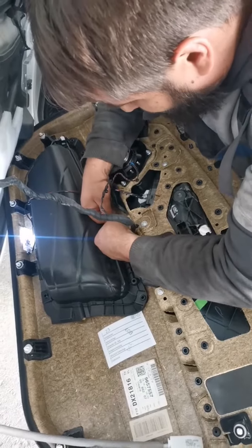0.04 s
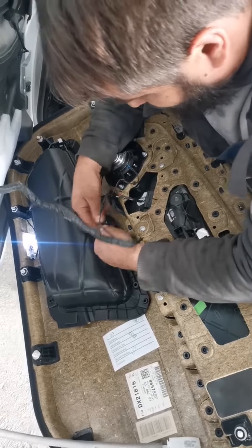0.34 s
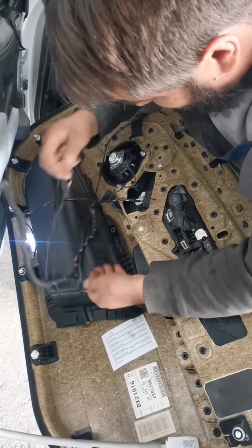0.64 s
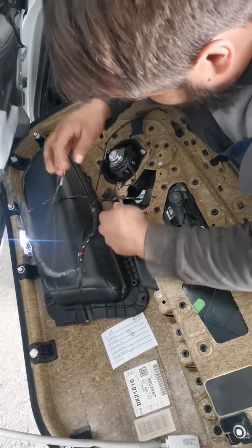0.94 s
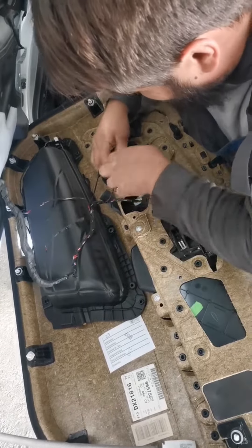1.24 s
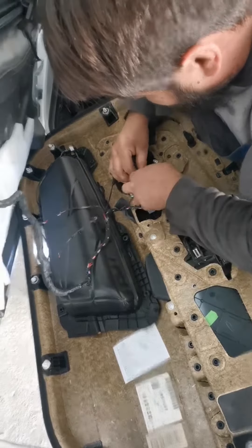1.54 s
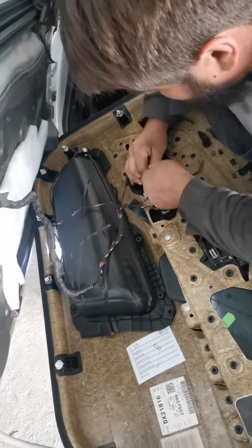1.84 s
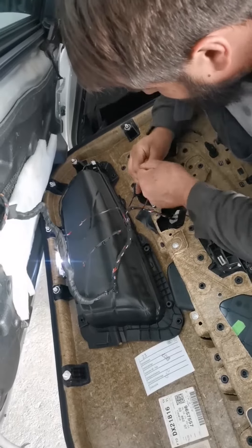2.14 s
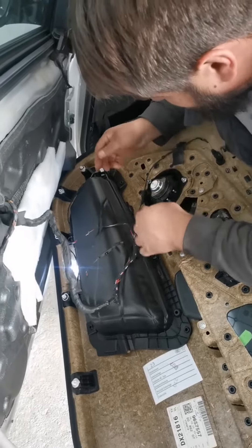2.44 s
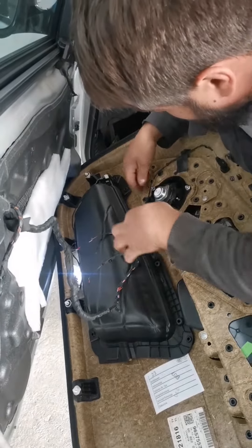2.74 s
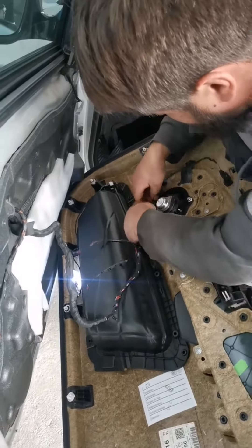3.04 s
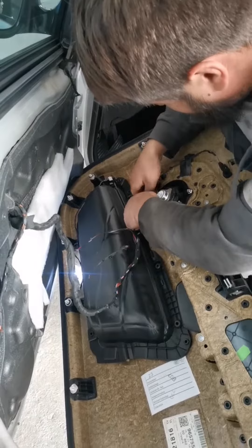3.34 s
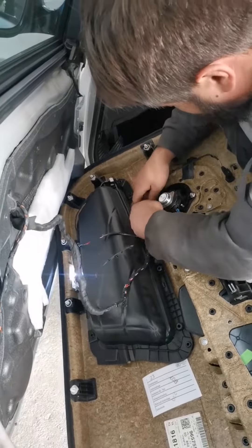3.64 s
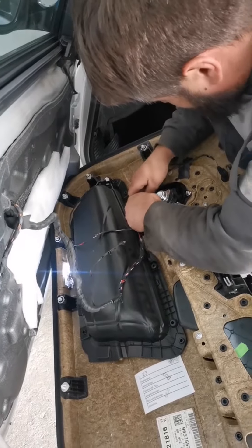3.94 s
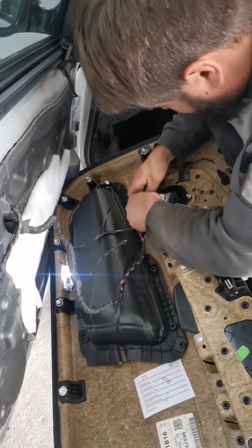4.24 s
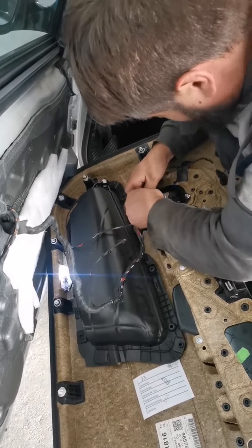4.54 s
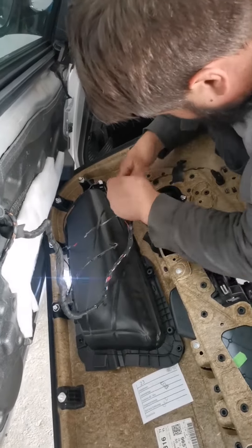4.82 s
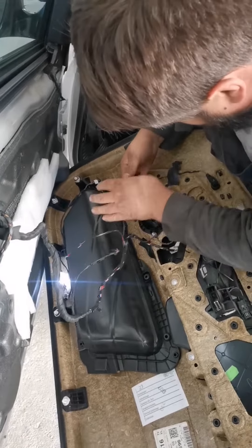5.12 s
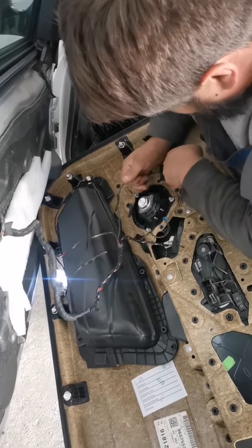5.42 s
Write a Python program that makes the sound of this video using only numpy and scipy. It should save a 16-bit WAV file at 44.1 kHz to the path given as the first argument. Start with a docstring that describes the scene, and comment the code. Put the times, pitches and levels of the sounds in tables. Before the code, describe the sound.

Hands press clips and a connector onto a door panel: sharp plastic cracks, hollow thuds and light scuffing in an echoing workshop.

```python
"""Clipping a car door panel together

Two hands press clips and a wiring connector home on a door trim panel lying in a workshop.
Each snap is a hard plastic crack on top of a hollow knock of the board; small fittings tick between them.
Sleeves and cables rub over the panel, a machine hums far off, and the hall rings on after loud blows."""
import sys
import numpy as np
from scipy import signal
from scipy.fft import rfft, irfft, next_fast_len
from scipy.io import wavfile
from scipy.ndimage import uniform_filter1d

SR = 44100
rng = np.random.default_rng(int(sys.argv[2]) if len(sys.argv) > 2 else 0)


def put_to_file(sound):
    """Save the sound as 16-bit audio at rate SR, in the file named by the first command-line argument."""
    columns = np.atleast_2d(sound).T  # one column per channel
    safe = np.clip(columns, -1, 1)
    whole_steps = np.round(safe * 32767)
    wavfile.write(sys.argv[1], SR, whole_steps.astype(np.int16))


N = 250488


def from_db(db):
    """Turn decibels into a gain."""
    return 10 ** (np.asarray(db) / 20)


def rms_one(x):
    """Scale to an average level (rms) of 1."""
    return x / np.sqrt(np.mean(x ** 2) + 1e-20)


def energy_one(x):
    """Scale every row to an energy of 1."""
    return x / np.sqrt(np.sum(x ** 2, axis=-1, keepdims=True) + 1e-20)


def in_time(rows):
    """Join a table's timed points into one curve per column."""
    times, *columns = np.transpose(rows)
    return [np.interp(np.arange(N) / SR, times, column) for column in columns]


def at_hz(points, hz):
    """Read a table on a log-frequency axis."""
    freqs, values = np.transpose(points)
    return np.interp(np.log(hz), np.log(freqs), values)


def band(x, low, high, order=2):
    """Keep the sound between two frequencies."""
    edges = [max(low, 10), min(high, .45 * SR)]
    return signal.sosfilt(signal.butter(order, edges, "band", fs=SR, output="sos"), x)


def lowpass(x, hz, order):
    """Soften the sound above a frequency."""
    return signal.sosfilt(signal.butter(order, hz, fs=SR, output="sos"), x)


def resonance(x, hz, t60):
    """Ring at one pitch; t60 is the time it takes to fade by 60 dB."""
    r = np.exp(-np.log(1000) / (t60 * SR))
    feedback = [1, -2 * r * np.cos(2 * np.pi * hz / SR), r * r]
    return signal.lfilter(np.array([1, 0, -1]) * (1 - r * r) / 2, feedback, x)


def stereo(mid, side, alike):
    """Mix two unrelated signals into a left and right of the given likeness (0-1)."""
    shared, apart = np.sqrt(1 + alike) * mid, np.sqrt(1 - alike) * side
    return np.stack([shared + apart, shared - apart], axis=-2)


def pan(db):
    """Two gains that make the left louder than the right by db."""
    return rms_one(from_db(db / 2 * np.array([[1], [-1]])))


def drift(rate):
    """Wander at random, heading for a new value `rate` times a second."""
    knots = rng.standard_normal(4096)
    return rms_one(np.interp(np.arange(N) / SR * rate, np.arange(len(knots)), knots))


def add(out, s, sound):
    """Mix a sound in at s seconds."""
    at = round(s * SR)
    out[:, at:at + sound.shape[-1]] += sound[:, :N - at]


def steady(x, size=900):
    """Even out the swells of a noise, as the steady pressure of a hand does."""
    power = np.mean(np.atleast_2d(x) ** 2, axis=0)
    smoothed = uniform_filter1d(uniform_filter1d(power, size), size)
    return rms_one(x / np.sqrt(np.abs(smoothed) + 1e-12))


# how alike left and right are for sound from all around: f/Hz, likeness/0-1
STEREO_LIKENESS = [(60, 0.85), (250, 0.98), (500, 0.75), (1000, 0.03), (2000, 0.02), (14000, 0)]

def diffuse_bands(low_hz=0, high_hz=20000):
    """Noise from all around in half-octave bands, as (centre Hz, band)."""
    white = rng.standard_normal((2, 2, N))
    edges = 32 * 2 ** np.arange(0, 9.1, .5)
    for k, (low, high) in enumerate(zip(edges, edges[1:])):
        hz = np.sqrt(low * high)
        if low_hz <= hz <= high_hz:
            yield hz, stereo(*band(white[k % 2], low, high), at_hz(STEREO_LIKENESS, hz)) / np.sqrt(2)


# tone of the workshop air: f/Hz, relative level/dB
AIR_TONE = [(35, -7), (70, -4), (95, -5.5), (135, -9), (220, -11), (400, -14.5), (1500, -35), (5000, -51),
            (11000, -42.5), (16000, -42)]

def air_noise(level_db=-60):
    """The workshop air makes a steady, low rush from all around."""
    size = next_fast_len(N)
    hz = np.maximum(np.arange(size // 2 + 1) * SR / size, 1)
    white = stereo(*rfft(rng.standard_normal((2, size))), at_hz(STEREO_LIKENESS, hz))
    rush = irfft(white * from_db(at_hz(AIR_TONE, hz)), size)[:, :N]
    return from_db(level_db) * rms_one(band(rush, 30, 17000))


# the motor's notes: f/Hz, base level/dB
MOTOR_NOTES = [(64.8, -60.5), (71.3, -61)]
# how strongly the hum comes through: t/s, gain/dB
HUM_GAIN = [(0, -18), (1, -12), (2, -11.5), (2.5, 0.5), (3.6, 3.5), (5, 1), (5.68, -3)]

def machine_hum(waver_db=2.0, wander_rad=0.92):
    """Two low notes of a distant motor beat against each other."""
    t, notes = np.arange(N) / SR, 0
    for hz, db in MOTOR_NOTES:
        peak = np.sqrt(2) * from_db(db + waver_db * drift(10))
        phase = 2 * np.pi * hz * t + wander_rad * hz / MOTOR_NOTES[0][0] * drift(3.1)
        notes += peak * np.sin(phase)
    return notes * from_db(in_time(HUM_GAIN)[0])


def rub(tone, grip_db, flicker_db, grip_rate):
    """Rubbing noise: all bands swell together as cloth grips and slips, and each flickers a little."""
    grip = grip_db * drift(grip_rate)
    return rms_one(sum(noise * from_db(at_hz(tone, hz) + grip + flicker_db * drift(40))
                       for hz, noise in diffuse_bands(tone[0][0], tone[-1][0])))


# tone of the board's rumble: f/Hz, relative level/dB
RUMBLE_TONE = [(30, -51), (80, -28), (130, 5), (200, 5.5), (300, 1), (450, -4.5), (650, -5), (1000, -74)]
# how strongly it rumbles: t/s, relative level/dB
RUMBLE_CURVE = [(0, -45.5), (0.2, -40.5), (0.35, -31), (0.48, -32.5), (0.72, -46.5), (0.85, -43.5),
                (1.05, -51.5), (1.68, -62.5), (1.88, -47.5), (2.06, -60), (2.17, -40), (2.45, -50.5),
                (3.2, -55), (3.72, -44), (4.3, -61), (4.6, -48.5), (4.9, -48.5), (5.03, -42), (5.67, -49.5)]

def board_rumble(gain_db=-4):
    """The board rumbles under moving hands and cables."""
    rumble = steady(rub(RUMBLE_TONE, grip_db=-3, flicker_db=1, grip_rate=16))
    return from_db(in_time(RUMBLE_CURVE)[0] + gain_db) * rumble


# tone of the scuffing: f/Hz, relative level/dB
SCUFF_TONE = [(350, 10), (650, 5.5), (1100, 6.5), (1700, -3), (2500, -3.5), (3400, -7), (5000, -89)]
# how hard the hands rub: t/s, relative level/dB
SCUFF_CURVE = [(0, -50.5), (0.45, -51), (0.92, -52), (1.03, -59.5), (1.16, -51.5), (1.4, -58.5),
               (1.76, -60), (1.95, -48.5), (2.13, -57.5), (2.36, -43), (2.74, -59.5), (3.0, -50.5),
               (3.42, -53), (3.7, -48), (4.2, -59), (4.82, -49.5), (5.04, -46.5), (5.67, -52.5)]

def hand_scuff(gain_db=-3):
    """Hands and cables scuff across the panel."""
    scuff = rub(SCUFF_TONE, grip_db=2.5, flicker_db=2, grip_rate=70)
    return from_db(in_time(SCUFF_CURVE)[0] + gain_db) * scuff


def cable_crackle(per_s=70, spread_db=4, gain_db=-13, ring_cycles=5.5, pitches=8):
    """Cables and nails make tiny ticks at several pitches, stronger when the hands rub harder."""
    sizes = from_db(spread_db * np.minimum(rng.exponential(1, N), 3))
    taps = sizes * (rng.random(N) < per_s / SR) * rng.choice([-1, 1], (2, N))
    pitch_of_tap = rng.integers(0, pitches, N)
    ticks = sum(resonance(taps * (pitch_of_tap == k) + 1e-18, hz, ring_cycles / hz) / np.sqrt(hz)
                for k, hz in enumerate(np.geomspace(700, 5000, pitches)))
    return from_db(in_time(SCUFF_CURVE)[0] + gain_db) * rms_one(band(ticks, 380, 6400))


# narrow treble peaks that colour the hiss and ticks: f/Hz, width/Hz, gain/dB
TREBLE_PEAKS = [(2900, 1100, 13.5), (4580, 510, 15.5), (5700, 1600, -2), (6770, 1400, 5), (9400, 520, 5.5)]

def treble_colour(x):
    """Add a few narrow treble peaks to a sound."""
    return x + sum(from_db(db) * resonance(x, hz, np.log(1000) / (np.pi * width))
                   for hz, width, db in TREBLE_PEAKS)


# tone of the cloth's hiss: f/Hz, relative level/dB
CLOTH_TONE = [(2200, -1), (3600, -1), (4800, 2), (6500, -3), (9500, -3.5), (12500, -16), (16000, -27)]
# sweeps of hiss, mostly a sleeve; those near 2.93 s and 4.64 s follow a snap and a clatter: t/s, length/s,
# relative level/dB
HISS_SWEEPS = [(0.0, 0.14, -44), (0.622, 0.29, -50), (1.136, 0.033, -50.5), (1.681, 0.26, -56),
               (1.916, 0.1, -51), (2.41, 0.1, -49), (2.934, 0.1, -45), (4.636, 0.041, -43),
               (4.969, 0.16, -52), (5.334, 0.25, -56)]

def sleeve_swishes(rise_s=0.0053, fade_s=0.067, rustle_db=-61, gain_db=-9.5):
    """Sleeves brush the panel, and hiss follows a snap and a clatter: each sweep swells, holds and fades over a
    faint rustle."""
    t = np.arange(N) / SR
    power = from_db(rustle_db) ** 2
    for s, length, db in HISS_SWEEPS:
        rise, fade = (t - s) / rise_s, 1 - (t - s - length) / fade_s
        power += (from_db(db) * np.clip(np.minimum(rise, fade), 0, 1)) ** 2
    hiss = treble_colour(rub(CLOTH_TONE, grip_db=1, flicker_db=2.5, grip_rate=280))
    return np.sqrt(power) * from_db(gain_db) * rms_one(hiss)


# light touches of nails and small fittings: t/s, level/dB, f/Hz
LIGHT_TOUCHES = [(0.114, -56, 4700), (0.398, -57, 4700), (0.635, -49.5, 5600), (0.749, -52, 4700),
                 (1.094, -61, 4400), (1.131, -57, 2980), (1.284, -60, 3160), (1.424, -56.5, 3080),
                 (1.703, -62.5, 5700), (1.883, -57, 3900), (1.93, -49.5, 3060), (1.95, -52, 3200),
                 (1.991, -53.5, 3140), (2.042, -56, 2980), (2.08, -56, 3180), (2.57, -62, 3000),
                 (3.13, -44, 3150), (3.186, -55, 2970), (3.23, -57, 2600), (3.679, -54, 2900),
                 (3.729, -54, 2920), (3.884, -43.5, 2830), (3.9, -50, 2950), (3.972, -60, 2930),
                 (4.062, -48.5, 2900), (4.857, -56.5, 3730), (4.88, -51.5, 3440), (4.902, -56, 3070),
                 (5.229, -55, 3030)]

def fingernail_ticks(rattle_t60=0.027, ping_t60=0.0062, ping_db=13):
    """Touches too weak to move the board: a brief, bright rattle and the ping of the part touched."""
    out, t = np.zeros((2, N)), np.arange(SR // 20) / SR
    fade = from_db(-60 * t / rattle_t60)
    for s, db, hz in LIGHT_TOUCHES:
        rattle = rng.standard_normal((2, len(t))) * fade
        tick = lowpass(band(treble_colour(rattle), 1300, 22000), 3500, order=1)
        ping = resonance(rattle * fade, hz, ping_t60)
        touch = energy_one(energy_one(tick) + from_db(ping_db) * energy_one(ping))
        add(out, s, from_db(db) * touch * np.sqrt(SR / 100))  # level as if spread over 10 ms
    return out


# plastic hitting the panel: t/s, base level/dB, hardness/dB per band (tilt towards the treble),
# hollowness/dB (loss one band from the middle), left over right/dB
SNAPS = [(0.14, -44.5, -0.5, 0.3, 4), (0.181, -18, -2, 1.5, 1.5), (0.1808, -47.5, 6.5, -0.5, -4),
         (0.2018, -43.5, 3, 0, 4), (0.227, -30.5, -5, 4.5, 1), (0.309, -39.5, -6.5, 1, 6),
         (0.3185, -31.5, -14.5, 14, -9), (0.473, -49.5, -4.5, -0.5, 2), (0.492, -47.5, -5, 0, 12),
         (0.689, -42, 2.5, 1.9, 1), (1.163, -46, -2.5, 2.5, 8), (1.342, -47.5, 9.5, 4, -4),
         (1.421, -49.5, -5, 1, 2), (1.478, -55.5, 0, 0, 9), (1.602, -42, -5.5, 2, 13),
         (1.884, -44.5, -1.5, 2.5, 5), (1.947, -44, 2, 3, 7), (2.081, -48, -6, 7.5, 4),
         (2.128, -25.5, 5, 2, 1), (2.1295, -25, 4, 3, 1), (2.5, -49.5, -0.5, 0.5, -5),
         (2.691, -50.5, -5, 7.5, 2), (2.893, -43.5, -4, 9, 2), (2.9185, -36, 7.5, 4, 0.5),
         (3.09, -49.5, 7, 4.5, 0), (3.129, -45, 5.5, 4, 4), (3.138, -42.5, 6.5, 7, -3),
         (3.28, -48, -1, 12.5, -4), (3.331, -41, -6, 14, -1), (3.5434, -33.5, 2.5, 5, 0.5),
         (3.575, -44.5, 1, 6.5, 2), (3.688, -49, -3, -0.5, 0), (3.792, -45, -1, 9, -1),
         (3.883, -45.5, 1, 4, 4), (3.97, -52, -2.5, 0, 0), (4.059, -49.5, -1, 3, 2),
         (4.15, -53, -2.5, 0.3, 3), (4.2009, -38, 1, 3, 12), (4.2049, -31.5, 1, 2, -1),
         (4.435, -57.5, 11, 4, 0), (4.6204, -30.5, -5.5, -0.1, 0), (4.6298, -30.5, -1.5, 1.5, -3),
         (4.642, -32.5, -4, 2.5, 1), (4.6465, -47.5, 4.5, -0.5, 6), (4.661, -43, -6, 2, -3),
         (4.668, -39, -3, 7, -6), (4.675, -41, -5, 7, 2), (4.683, -39.5, -4, -1, 0),
         (4.694, -38.5, 2, 6, -8), (4.71, -42, 1.5, 0, 6), (4.7104, -29, -1, 3, 1),
         (4.767, -59, -5.5, -3, -3), (4.879, -41, -4.5, 6.5, 0), (4.935, -51, -6.5, -0.5, 0),
         (5.167, -40, -0.5, 1.5, -3), (5.227, -51, 1, 7, -7)]
# edges of a snap's five bands, from the flexing board up to the hard clip: f/Hz
BAND_EDGES = [118, 280, 750, 1900, 4500, 13000]
# the board's own strength in each band, low to high: gain/dB
BAND_GAINS = [-4, 2, -2.8, -1.6, -3.5]
# the rattle in each band: fade time/s, level over the first click/dB, left-right likeness/0-1
BAND_RATTLES = [(0.051, -7, 1), (0.048, 3, 0.8), (0.033, 31, 0.15), (0.033, 16.5, 0.05), (0.023, 74, 0)]
# pitches at which the board and its fittings ring: f/Hz, fade time/s, gain/dB
PANEL_PITCHES = [(122, 0.024, 2.5), (183.5, 0.088, 10.5), (223.6, 0.056, 2.5), (332, 0.084, -2),
                 (444, 0.14, 2.5), (603, 0.066, -2.5), (922, 0.059, 3.5), (985, 0.043, 3), (1149, 0.017, 9),
                 (1447, 0.06, -0.5), (1790, 0.043, 1), (1998, 0.039, 0.5), (2480, 0.025, -6.5),
                 (3040, 0.025, -2), (3530, 0.025, 0), (4260, 0.048, 1), (4730, 0.01, 5),
                 (6680, 0.016, -0.5)]

def plastic_snaps(dull_hz=5200, touch_spread_db=3, max_lag_s=0.00019):
    """Each snap is a click and a short rattle that set the panel ringing."""
    times, levels, hardness, hollowness, pans = np.transpose(SNAPS)
    t, count = np.arange(SR // 9) / SR, len(times)
    # a click reaches the two microphones at slightly different moments
    arrival = np.round(rng.random((count, 2, 1)) * max_lag_s * SR)
    click = (np.arange(len(t)) == arrival) + 1e-18
    out, snaps = np.zeros((2, N)), 0
    for k, (rattle_t60, rattle_db, alike) in enumerate(BAND_RATTLES):
        low, high = BAND_EDGES[k:k + 2]
        mid, side = rng.standard_normal((2, count, len(t))) * from_db(-60 * t / rattle_t60)
        force = click + from_db(rattle_db) * energy_one(stereo(mid, side, alike))
        ringing = force.copy()
        for hz, t60, db in PANEL_PITCHES:
            if low / 2 < hz < high * 2:
                # the spot touched sets how strongly each pitch answers
                touch_db = touch_spread_db * rng.standard_normal((count, 1, 1))
                ringing += from_db(db + touch_db) * resonance(force, hz, t60)
        rounded = lowpass(ringing, dull_hz, order=2)  # plastic gives, which dulls the crack
        crack = energy_one(band(rounded, low, high, order=3)) * np.sqrt(SR / 100)
        from_middle = k - 2
        band_db = levels + hardness * from_middle - hollowness * from_middle ** 2 + BAND_GAINS[k]
        snaps += crack * from_db(band_db)[:, None, None]
    for s, pan_db, snap in zip(times, pans, snaps):
        add(out, s, snap * pan(pan_db))
    return out


# heavy pushes on the panel: t/s, relative level/dB
PUSHES = [(0.18, -50), (0.321, -51), (1.6, -58), (2.13, -48), (3.077, -51.5), (4.623, -39.5), (4.7, -52)]

def panel_rocking(low_hz=66, high_hz=104, high_db=13.5, t60=0.12):
    """A heavy push bounces the whole panel on its support for a few slow swings."""
    out, t = np.zeros((2, N)), np.arange(SR // 4) / SR
    swing = np.sin(2 * np.pi * low_hz * t) + from_db(high_db) * np.sin(2 * np.pi * high_hz * t)
    bounce = band(swing * from_db(-60 * t / t60), 47, 390)
    for s, db in PUSHES:
        add(out, s, from_db(db) * bounce[None])
    return out


# knocks, pitched by the spot that gives: t/s, relative level/dB, f/Hz, fade time/s, left over right/dB
KNOCKS = [(0.1801, 4, 210, 0.017, 1.5), (0.186, -4, 337, 0.026, 6), (0.198, -25, 110, 0.04, 2),
          (0.225, -20, 434, 0.13, 9), (0.23, -26, 230, 0.026, 10), (0.256, -28, 223, 0.027, 6),
          (0.28, -17.5, 212, 0.039, 5), (0.3192, -14, 394, 0.044, 4), (0.329, -20.5, 260, 0.079, 3.5),
          (0.697, -34.5, 401, 0.087, 8), (1.164, -37, 358, 0.084, -1), (1.179, -33, 220, 0.018, 2),
          (1.603, -30.5, 390, 0.031, 30), (1.898, -36.5, 222, 0.076, 3), (2.128, -11, 235, 0.016, 2),
          (2.131, -30, 612, 0.12, 8), (2.137, -30.5, 338, 0.22, 5), (2.857, -32, 190, 0.022, 1),
          (3.079, -25, 154, 0.049, -2), (3.136, -41, 176, 0.095, 0), (3.544, -33.5, 152, 0.061, 1),
          (3.547, -32, 510, 0.053, 4), (4.208, -20.5, 158.6, 0.054, -1.5), (4.6211, -10.5, 471, 0.043, 1),
          (4.623, -21, 149, 0.071, -2), (4.641, -20.5, 440, 0.06, 2), (4.7112, -14, 400, 0.035, 2),
          (4.7144, -15, 215, 0.026, -0.5)]

def board_thuds(low_hz=105, high_hz=1100):
    """The board gives under a blow and swings back a few times; it sends out little deep bass."""
    out, t = np.zeros((2, N)), np.arange(SR // 5) / SR
    for s, db, hz, t60, pan_db in KNOCKS:
        swing = -np.sin(2 * np.pi * hz * t) * from_db(db - 60 * t / t60)
        add(out, s, swing * pan(pan_db))
    return band(out + 1e-18, low_hz, high_hz)


# parts that sing on after a snap: t/s, level/dB, f/Hz, width/Hz, fade time/s
SINGING_PARTS = [(0.187, -35, 342, 200, 0.65), (0.184, -58, 11300, 2500, 0.32),
                 (0.2, -49, 4970, 3000, 0.32), (0.2006, -46, 10500, 5000, 0.035),
                 (1.228, -40, 1360, 744, 0.062), (1.275, -52, 1410, 397, 0.17),
                 (1.3418, -24, 2720, 690, 0.015), (1.341, -33, 4200, 400, 0.027),
                 (1.341, -32, 6160, 350, 0.015), (1.342, -47.5, 11100, 700, 0.025),
                 (1.34, -43, 1630, 600, 0.18), (1.343, -56, 3660, 1810, 1), (1.603, -30.5, 613, 352, 0.042),
                 (2.129, -15, 610, 160, 0.039), (2.135, -38.5, 770, 540, 1), (2.135, -55, 2900, 1200, 0.99),
                 (2.129, -15, 1220, 520, 0.046), (2.919, -21, 3050, 800, 0.018),
                 (2.92, -36, 6700, 2500, 0.016), (2.918, -62, 7450, 1800, 0.95),
                 (3.28, -41, 1350, 500, 0.016), (3.5439, -15.5, 1000, 398, 0.019),
                 (3.5444, -21.5, 1380, 297, 0.026), (3.546, -41.5, 1100, 446, 0.74),
                 (3.576, -28.5, 1060, 500, 0.043), (4.2053, -9, 1040, 480, 0.0095),
                 (4.205, -22, 4700, 1420, 0.032), (4.207, -43, 4240, 1530, 0.75),
                 (4.621, -15, 920, 200, 0.064), (4.6305, -22, 860, 300, 0.029),
                 (4.63, -53, 12500, 5000, 0.23), (4.666, -35, 1510, 1600, 0.11)]

def ringing_parts():
    """Fittings and board ring at many close pitches, made here as fading bands of noise."""
    out = np.zeros((2, N))
    for s, db, hz, width, t60 in SINGING_PARTS:
        t = np.arange(round(np.clip(t60, .15, 1) * SR)) / SR
        noise = stereo(*rng.standard_normal((2, len(t))), at_hz(STEREO_LIKENESS, hz))
        ring = rms_one(band(noise, hz - width / 2, hz + width / 2))
        add(out, s, from_db(db - 60 * t / t60) * ring)
    return out


# path of the squeak: t/s, f/Hz, level/dB
SQUEAK_CURVE = [(1.375, 10900, -110), (1.40, 11250, -78), (1.425, 11800, -88), (1.44, 11900, -115),
                (1.51, 12250, -115), (1.522, 12150, -77), (1.545, 11650, -75), (1.56, 11100, -86),
                (1.58, 10500, -115)]

def plastic_squeak(flutter_db=5, scatter_hz=220):
    """Plastic slides on plastic with two faint, broken chirps."""
    hz, db = in_time(SQUEAK_CURVE)
    gain = from_db(db + flutter_db * drift(160))
    pitch = hz + scatter_hz * drift(1500)
    return gain * np.sin(2 * np.pi * np.cumsum(pitch) / SR)


# loudness of the sliding connector: t/s, level/dB
SLIDE_CURVE = [(3.3, -105), (3.38, -90), (3.44, -68), (3.52, -73), (3.6, -80), (3.9, -105)]

def connector_slide(hz=6880, t60=0.006, grip_db=3):
    """The connector is worked along its seat with a narrow, broken hiss."""
    gain = from_db(in_time(SLIDE_CURVE)[0] + grip_db * drift(70))
    return gain * rms_one(resonance(rng.standard_normal((2, N)), hz, t60))


# loudness of the dragging cable: t/s, level/dB
DRAG_CURVE = [(0, -110), (4.88, -110), (4.93, -52), (5.0, -41.5), (5.06, -42.5), (5.13, -37), (5.17, -43),
              (5.21, -110)]

def cable_drag(slips_per_s=420, low_hz=140, high_hz=340):
    """A cable drags over the board: many small slips keep its low pitches groaning."""
    slips = (rng.random(N) < slips_per_s / SR) * rng.choice([-1, 1], N) + 1e-18
    ringing = sum(from_db(db) * resonance(slips, hz, t60) for hz, t60, db in PANEL_PITCHES if hz < 700)
    groan = band(slips + ringing, low_hz, high_hz)
    return from_db(in_time(DRAG_CURVE)[0]) * steady(groan)


# how long the hall rings: f/Hz, fade time/s
ECHO_FADE = [(100, 0.12), (300, 1.07), (1000, 0.8), (3000, 0.91), (6000, 0.71), (14000, 0.2)]
# strength of the echo next to the direct sound: f/Hz, level/dB
ECHO_LEVEL = [(70, -9), (200, -10), (450, -13.5), (1000, -11), (3000, -10), (6000, -23.5), (14000, -18)]

def hall_echo(x, build_s=0.00054, shortest_t60=0.2):
    """The hall stores each band's energy and lets it out as a fading wash of noise."""
    out, fill = 0, np.exp(-1 / (build_s * SR))
    for hz, noise in diffuse_bands():
        power = np.mean(band(x, hz / 2 ** .25, hz * 2 ** .25) ** 2, axis=0)
        t60 = max(at_hz(ECHO_FADE, hz), shortest_t60)
        keep = np.exp(-np.log(1e6) / (t60 * SR))  # share of energy left after one sample
        feedback = np.convolve([1, -keep], [1, -fill])
        stored = signal.lfilter([(1 - keep) * (1 - fill)], feedback, power + 1e-18)
        out += rms_one(noise) * np.sqrt(np.abs(stored)) * from_db(at_hz(ECHO_LEVEL, hz))
    return out


def scene():
    """Snaps and ticks echo in the hall, over the rubbing, the hum and the air."""
    hits = plastic_snaps() + board_thuds() + cable_crackle() + fingernail_ticks()
    rubbing = board_rumble() + hand_scuff() + sleeve_swishes()
    air = air_noise()
    ringing = hall_echo(hits) + panel_rocking() + ringing_parts()
    sliding = cable_drag() + connector_slide() + plastic_squeak()
    return hits + ringing + rubbing + sliding + machine_hum() + air


def mic_opening(x, peaks):
    """The small channel in front of a microphone lifts and swallows narrow parts of the treble."""
    for hz, width, db in peaks:
        angle, half_gain = 2 * np.pi * hz / SR, from_db(db / 2)
        edge = np.sin(angle) * width / (2 * hz) * np.array([1, 0, -1])
        centre = np.array([1, -2 * np.cos(angle), 1])
        x = signal.lfilter(centre + edge * half_gain, centre + edge / half_gain, x)
    return x


# peaks and dips of the left microphone's opening: f/Hz, width/Hz, gain/dB
LEFT_PEAKS = [(2300, 530, -1), (3050, 890, 0.5), (4700, 1200, -3.5), (8730, 4000, 2.5), (9200, 770, 3.5)]
# and of the right one: f/Hz, width/Hz, gain/dB
RIGHT_PEAKS = [(2270, 260, 2.5), (3200, 750, -2), (4920, 240, 0.5), (6830, 1050, 4.5), (8230, 1800, -7),
               (9300, 1300, -7), (12600, 1300, 2.5)]

def record(dry, soften_hz=14300, cutoff_hz=15800):
    """Each microphone colours its side, the top rolls off, and any peak too loud is clipped."""
    heard = np.array([mic_opening(dry[0], LEFT_PEAKS), mic_opening(dry[1], RIGHT_PEAKS)])
    clipped = np.clip(lowpass(heard, soften_hz, order=4), -1, 1)
    return signal.sosfilt(signal.ellip(10, .1, 90, cutoff_hz, fs=SR, output="sos"), clipped)


dry = scene()
out = record(dry)
put_to_file(out)
```